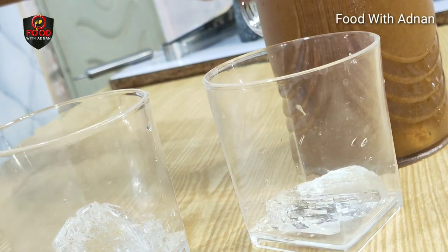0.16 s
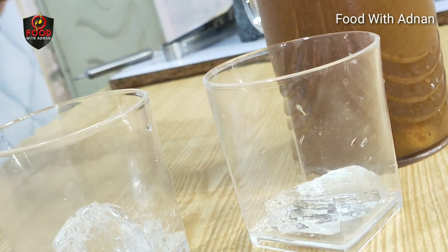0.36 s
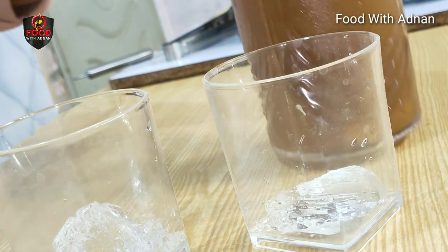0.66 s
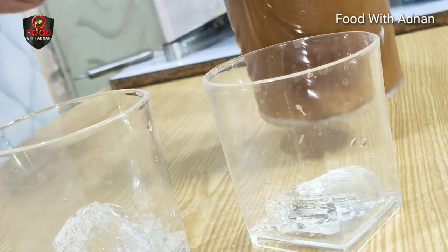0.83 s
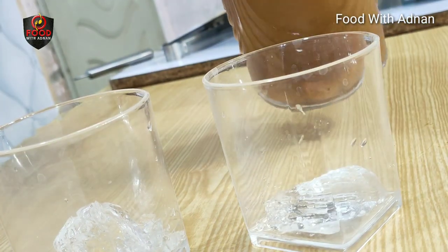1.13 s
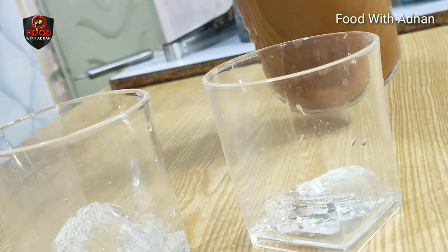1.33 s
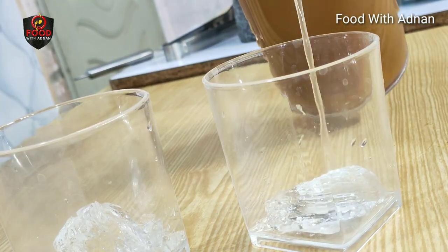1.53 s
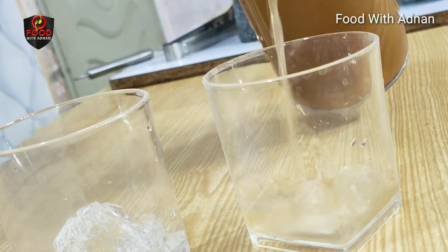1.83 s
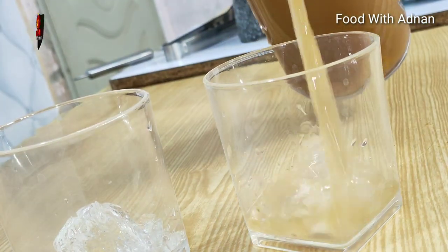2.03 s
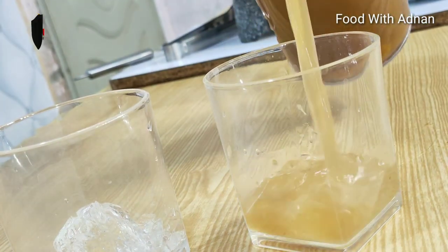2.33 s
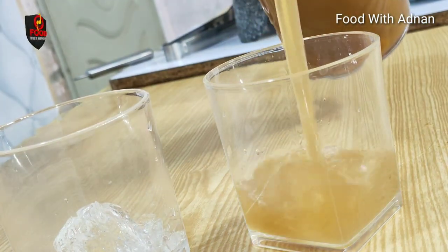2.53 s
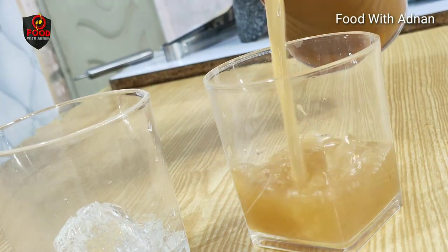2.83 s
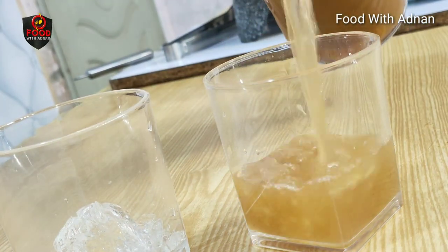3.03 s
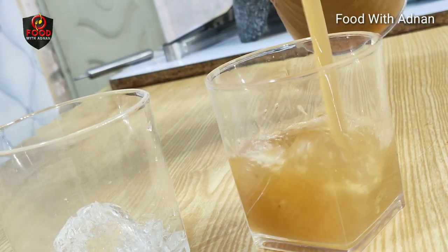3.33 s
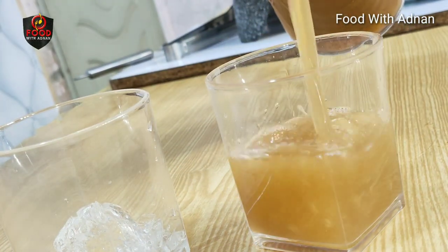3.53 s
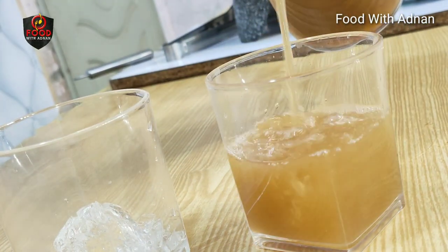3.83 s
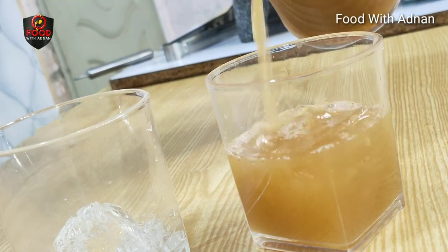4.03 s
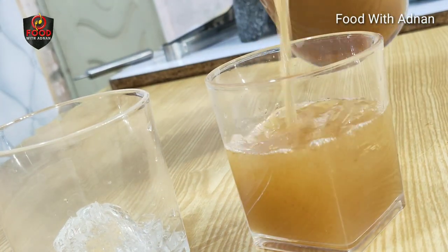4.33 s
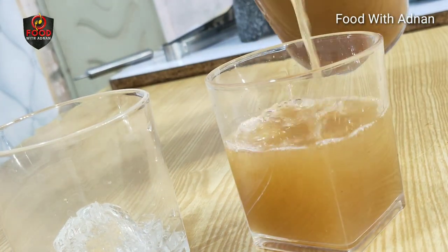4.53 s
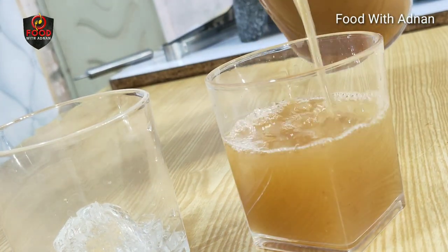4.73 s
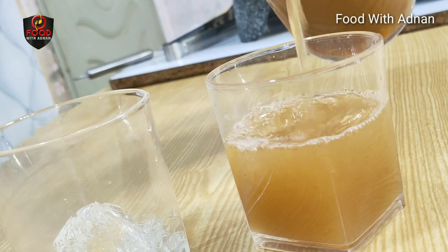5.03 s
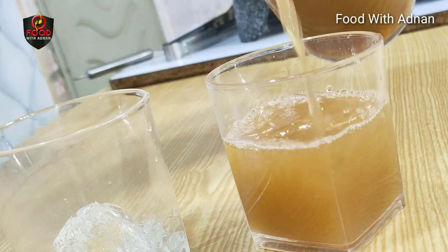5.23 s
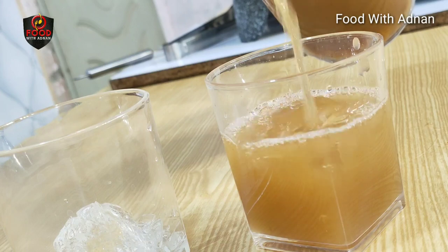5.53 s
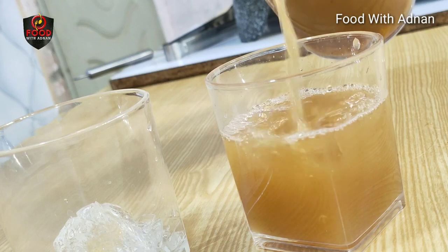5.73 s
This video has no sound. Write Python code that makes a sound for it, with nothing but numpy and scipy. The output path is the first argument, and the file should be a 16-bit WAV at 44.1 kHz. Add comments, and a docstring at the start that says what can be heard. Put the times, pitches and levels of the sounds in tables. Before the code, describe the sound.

Quiet pouring of a drink over ice in a glass, broken by two short clattering clunks and followed by soft low glugs and bubbles.

```python
"""Ice cubes drop into a glass tumbler on a worktop in a hard-walled kitchen while a drink is poured over them.
Each blow excites decaying modes of the glass, a short note of the cube and a burst of crushing noise; small
rebounds follow each fall. Soft bumps of wet ice and low glugs of the drink are short notes with uneven noise,
ice cracks with tiny tinks, bubbles ring with rising pitch, and a thin stream of short decaying grains trickles
in surges. Decaying echoes answer, over a faint hush of shaped noise."""
import sys
import numpy as np
from scipy import signal
from scipy.fft import rfft, irfft, next_fast_len
from scipy.io import wavfile
from scipy.ndimage import uniform_filter1d

SR = 44100
rng = np.random.default_rng(int(sys.argv[2]) if len(sys.argv) > 2 else 0)


def materialize(psi):
    """Save the field psi as 16-bit PCM at rate SR to the path in sys.argv[1].

    A 1-D psi becomes a single channel; in a 2-D psi each row is a channel.
    """
    bounded = np.clip(np.atleast_2d(psi).T, -1, 1)
    quanta = np.round(bounded * 32767).astype(np.int16)
    wavfile.write(sys.argv[1], SR, quanta)


N = 259296  # length in samples

# Cubes striking glass or ice; hardness near 0 is a flat clunk, near 1 a sharp click:
# start_s, strength_db, hardness, cube_note_hz, ring_freedom_db, room_share_db
ICE_HITS = [(1.5677, -54.5, 0.7, 2450, -2, 9.5), (1.573, -51.5, -0.26, 2200, 5, 3),
            (1.6027, -41.5, 1.06, 2030, -5, 3), (1.6143, -47.5, 0.75, 3570, -3, 2.5),
            (1.6215, -46, 0.87, 2910, 1, -1), (1.6595, -49, 1, 2770, -5, -3),
            (1.7717, -24.5, 0.18, 2530, -1, -2.5), (1.799, -33, 0.98, 2683, 11.5, -3),
            (1.8066, -34, 0.59, 3750, -3.5, 3), (1.8306, -41.5, 0.074, 2430, 0, 3.5),
            (1.8351, -33.5, 0.54, 2050, 0.5, 4.5), (1.984, -46, 0.74, 2920, 5, 3.5),
            (2.023, -43.5, 0, 3020, 5, -1.5), (2.031, -41, 0.39, 1910, 1, -2.5),
            (2.098, -43.5, 0.9, 2910, 0.5, -7), (2.1144, -47, 0.87, 2944, -2, -3.5),
            (2.8044, -50, 0.26, 2690, 4, 0), (2.8105, -50.5, 0, 2680, 5.5, -10),
            (3.0014, -28, 0.094, 2020, -4, 0.5), (3.0126, -34.5, 0.49, 2930, 8, 0),
            (3.0242, -34, .7, 2430, -2.5, 3.5), (3.033, -29, 0.7, 4150, -6.5, -5),
            (3.04, -42, 0, 2670, -14.5, -5), (3.0566, -35, 0.19, 2730, -3, 4),
            (3.088, -40.5, 0.36, 2550, 8, -1), (3.13, -39, 0, 2720, -6, -2),
            (3.1852, -46, 0.13, 1860, 0.5, 3), (3.196, -45.5, 0, 2540, 3, -5.5),
            (3.222, -46, 0.41, 2700, 4.5, -6)]
# Rebounds as the ice settles after a fall: start_s, initial_level_db
ICE_FALLS = [(1.80, -48), (3.00, -50)]
SETTLE_S, SETTLE_DB_PER_S, SETTLE_GAP_S = 0.33, 48.5, 0.03  # duration, decay, mean gap
SETTLE_NOTE_HZ = 2650
# Tumbler modes on the worktop, nearly empty: mode_hz, relative_level_db, t60_s
EMPTY_GLASS_MODES = [(102, -40, 0.5), (248, -28.5, 0.14), (530, 0, 0.012), (1008, 1, 0.027),
                     (1064, -33.5, .4), (1115, -10.5, 0.017), (2250, -6.5, 0.016), (2120, -32.5, 0.4),
                     (2432, -3.5, 0.027), (4100, -4, 0.014), (4360, -13.5, 0.011)]
# Tumbler modes when part filled: mode_hz, relative_level_db, t60_s
FILLED_GLASS_MODES = [(106.8, -30.5, 0.64), (228, -20, 0.17), (408, -10, 0.0012), (537, 2.5, 0.0088),
                      (1060, -33, .42), (1065, -1, 0.01), (1307, -30.5, 0.26), (1430, -37.5, 0.41),
                      (1457, -15.5, 0.022), (2774, -3, 0.017), (4350, -5, 0.014)]
FILLED_FROM_S = 2.5
# Attack balance of a flat clunk: thud_db, knock_db, ring_db, tick_db
CLUNK_BALANCE = (-4, 2, -9.5, -23.5)
# Attack balance of a sharp click: thud_db, knock_db, ring_db, tick_db
CLICK_BALANCE = (-5.5, -10.5, 0, -3)
# Edges of the thud, knock, ring and tick bands: edge_hz
BAND_EDGES_HZ = [65, 800, 1700, 3400, 14000]
BANDS = [
    signal.butter(3, band, "band", fs=SR, output="sos")
    for band in zip(BAND_EDGES_HZ, BAND_EDGES_HZ[1:])
]
# Spectrum of a brittle contact: frequency_hz, relative_level_db
CONTACT_COLOUR = [(80, -4.5), (420, 11), (1500, 0), (3500, 2.5), (5000, 4), (8500, 0.5), (10500, -11),
                  (15000, -12)]
SPLINTER_S = 0.003  # how long ice splinters at a blow
HARD_CRUSH_DB = 5.5  # extra splintering of a sharp click over a flat clunk
# Soft bumps of wet ice and low glugs of the poured drink: start_s, strength_db, hollow_note_hz
SOFT_BUMPS_AND_GLUGS = [(0.244, -71, 420), (0.317, -66, 1540), (0.484, -72, 1290), (0.895, -61, 904),
                        (1.262, -63.5, 1485), (1.443, -65, 1505), (1.456, -58.5, 2560),
                        (1.496, -63.5, 1400), (1.531, -61, 910), (1.742, -62, 2690), (2.397, -62.5, 1555),
                        (2.525, -70, 1148), (2.602, -58.5, 1028), (2.728, -59, 1090), (2.753, -60, 720),
                        (2.873, -62, 940), (2.948, -61, 807), (2.982, -57, 920), (3.318, -58.5, 1215),
                        (3.429, -65.5, 1149), (3.581, -68, 690), (3.63, -58.5, 596), (3.71, -67.5, 409),
                        (3.739, -61, 607), (3.827, -59, 570), (3.859, -53.5, 550), (3.9595, -56.5, 510),
                        (4, -51, 568), (4.051, -61.5, 940), (4.263, -65, 1453), (4.300, -61.5, 620),
                        (4.3405, -55, 644), (4.377, -62, 629), (4.417, -60.5, 420), (5.177, -67, 1780)]
# Attack balance of a bump or glug by its note: hollow_note_hz, thud_db, knock_db, ring_db, tick_db
BUMP_BALANCE = [(565, 0, -7.5, -13.5, -22.5), (1000, -4.5, 1.5, -7, -19), (1482, -3, 1, -3.5, -18.5),
                (2600, -13, -6, -2, -16.5)]
# Spectrum of the uneven noise in a bump or glug: frequency_hz, relative_level_db
RUB_COLOUR = [(100, -3), (550, 2), (1200, -4), (1500, -6.5), (1950, -6.5), (2750, 1.5), (3400, -12),
              (4500, -9.5), (6000, -12.5), (9000, -18.5), (14000, -17.5)]
# Tiny cracks in the ice: start_s, peak_db, note_hz
ICE_CRACKS = [(2.4146, -59.5, 6070), (2.445, -63, 4020), (2.626, -58, 4490), (2.825, -54, 4100),
              (2.874, -55, 4500), (2.9143, -56, 7130), (2.948, -52, 4350), (4.1999, -63, 4640),
              (4.4164, -57, 4280), (4.7516, -63.5, 6720), (5.1674, -61, 8800), (5.425, -58, 8530)]
# Small drips that trap a bubble: start_s, level_db, note_hz
BUBBLE_DRIPS = [(3.867, -50, 1950), (4.035, -52.5, 2480), (4.262, -52, 1800), (4.419, -52, 1880),
                (4.682, -55, 1810), (5.179, -58, 1930)]
# Surges of the stream: peak_s, level_db, build_up_s, fall_back_s
STREAM_SURGES = [(1.679, -62.5, 0.15, 0.067), (2.95, -65.5, 0.38, .2), (3.92, -70, 0.39, .55)]
STEADY_STREAM_DB = -76
# Spectrum of the trickle: frequency_hz, relative_level_db
TRICKLE_COLOUR = [(100, -0.5), (400, 1.5), (700, 1.5), (1500, -3.5), (2700, -12), (3800, -20), (9000, -22),
                  (13000, -29.5)]
# Faint dull pops: peak_s, peak_db
DULL_POPS = [(0.1338, -49), (0.7332, -45), (4.6809, -49.5), (5.855, -51)]
# Late echo of the kitchen: frequency_hz, t60_s, relative_level_db
ROOM_DECAY = [(50, 1, -10), (130, 0.91, -2.5), (250, 0.9, 4), (520, 0.47, -2), (800, 0.78, -2.5),
              (1170, 0.56, 2), (1900, 0.57, -2), (2785, 0.53, -4.5), (4600, 0.43, 2.5), (8140, 0.46, -4),
              (12000, 0.73, -5)]
# Spectrum of the hush: frequency_hz, relative_density_db_per_hz
HUSH_COLOUR = [(15, -42.5), (25, 8.5), (90, -2), (142, -3), (373, -2.5), (673, -5.5), (769, -13),
               (1210, -10), (1350, -17.5), (2370, -18), (4040, -30), (10300, -32), (12100, -31),
               (13500, -47.5), (15000, -46)]
HUSH_LEVEL_DB = -70.5
# Response of the microphone: frequency_hz, gain_db
MIC_RESPONSE = [(20, 1.5), (9500, -1.5), (10500, 0), (11500, -13), (13000, -14.5), (16000, -12)]
BAND_LIMIT_HZ = 15400


def clunks(note_db=11, note_t60=0.015, wall_ring_db=-3, crush_db=-4, rise=0.00044, spread_db=3.0, echoes=3):
    """Impact excitation: a blow rings glass modes and a cube note; returns direct sound and room feeds."""
    direct, outward = np.zeros(N), np.zeros((echoes, N))
    t = np.arange(SR // 2) / SR
    brief = t[:SR // 30]
    empty = np.array([ring(t, *mode) for mode in EMPTY_GLASS_MODES])
    filled = np.array([ring(t, *mode) for mode in FILLED_GLASS_MODES])
    clunk, click = np.array(CLUNK_BALANCE), np.array(CLICK_BALANCE)
    for k, (s, strength_db, hardness, hz, free_db, room_db) in enumerate(ICE_HITS + settling()):
        balance = (1 - hardness) * clunk + hardness * click
        thud_db, knock_db, ring_db, tick_db = strength_db + balance
        modes = empty if s < FILLED_FROM_S else filled
        # each spot on the wall favours other modes
        mode_gains = amp(spread_db * rng.standard_normal((len(modes), 1)))
        glass = (mode_gains * modes).sum(0)
        # brittle ice splinters for a few milliseconds, then stops sharply
        crush = coloured(rng.standard_normal(len(brief)), CONTACT_COLOUR)
        crush = crush * np.exp(-(brief / SPLINTER_S) ** 2)
        add(glass, 0, amp(crush_db + HARD_CRUSH_DB * hardness) * crush)
        levels_db = thud_db, knock_db, ring_db + free_db + wall_ring_db, tick_db
        sound = weigh(glass * swell(t, rise), levels_db, attack=0.006)
        cube_note = ring(brief, hz, ring_db + free_db + note_db, note_t60)
        add(sound, 0, cube_note * swell(brief, rise))
        add(direct, s, sound)
        # blows take turns among several random echoes of the same kitchen
        add(outward[k % echoes], s, amp(room_db) * sound)
    return direct, outward


def settling(spread_db=3, hardness=0.98, note_spread=0.12, free_db=1, room_db=-3):
    """Energy loss in rebounds: small uneven blows die away after each fall, as rows like ICE_HITS."""
    rows = []
    for start, initial_db in ICE_FALLS:
        wait, size, note = rng.random((3, 40))
        times = np.cumsum(SETTLE_GAP_S * (0.5 + wait))
        for since, level_offset, note_offset in zip(times, 2 * size - 1, 2 * note - 1):
            if since < SETTLE_S:
                level_db = initial_db - SETTLE_DB_PER_S * since + spread_db * level_offset
                hz = SETTLE_NOTE_HZ * (1 + note_spread * note_offset)
                rows.append((start + since, level_db, hardness, hz, free_db, room_db))
    return rows


def weigh(sound, levels_db, attack):
    """Band balance: sets the strength of thud, knock, ring and tick in the attack."""
    parts = [signal.sosfilt(band, sound) for band in BANDS]
    first = int(attack * SR)
    return sum(amp(db) * part / rms(part[:first]) for db, part in zip(levels_db, parts))


def soft_bumps_and_glugs(note_db=6, note_t60=0.027, rub_t60=0.097, rub_db=-1, rise=0.0054):
    """Damped resonance: each bump or glug is a hollow decaying note with a little uneven noise."""
    out, t = np.zeros(N), np.arange(SR // 6) / SR
    faint = stirred(per_s=5, over_db=2.5, spread_db=3, low_hz=404, high_hz=1485)
    for s, db, hz in SOFT_BUMPS_AND_GLUGS + faint:
        # a low note is mostly thud, a high one knock and ring
        levels_db = [db + read(BUMP_BALANCE, hz, axis=band) for band in range(1, len(BUMP_BALANCE[0]))]
        note = ring(t, hz, note_db, note_t60) * swell(t, rise / 2)
        rub = scrape(t, rub_t60, RUB_COLOUR) * (0.5 + unevenness(t, per_s=970)) * swell(t, rise)
        add(out, s, weigh(note + amp(rub_db) * rub, levels_db, attack=0.015))
    return out


def unevenness(t, per_s):
    """Random modulation: an uneven train of millisecond bumps at unit rms."""
    impulses = rng.random(len(t)) * (rng.random(len(t)) < per_s / SR)
    bumps = uniform_filter1d(impulses, size=45)
    return bumps / rms(bumps)


def scrape(t, t60, colour):
    """Noise burst: coloured noise under exponential decay."""
    return coloured(rng.standard_normal(len(t)), colour) * amp(-60 * t / t60)


def cracks(t60=0.016, crush_db=-3, rise=0.00025):
    """Brittle fracture: warming ice splits with a tiny high tink of mode and noise."""
    out, t = np.zeros(N), np.arange(SR // 20) / SR
    faint = stirred(per_s=9.1, over_db=1.5, spread_db=5, low_hz=3890, high_hz=5415)
    for s, db, hz in ICE_CRACKS + faint:
        split = ring(t, hz, 0, t60) + amp(crush_db) * scrape(t, t60, CONTACT_COLOUR)
        tink = signal.sosfilt(BANDS[-1], split * swell(t, rise))
        add(out, s, amp(db) * tink / abs(tink).max())
    return out


def drips(t60=0.02, glide_per_s=5, rise=0.00067):
    """Bubble resonance: a decaying note climbs in pitch as the bubble nears the surface."""
    out, t = np.zeros(N), np.arange(SR // 20) / SR
    faint = stirred(per_s=12, over_db=7, spread_db=3.5, low_hz=498.7, high_hz=3200)
    for s, db, hz in BUBBLE_DRIPS + faint:
        # the glide scales the phase, so the pitch climbs at twice this rate
        bubble = ring(t, hz * (1 + glide_per_s * t), db, t60)
        add(out, s, bubble * swell(t, rise))
    return out


def trickle(per_s=900, spread_db=3.0, t60_at_1khz=0.003):
    """Granular superposition: fine wet grains add up to a trickle whose level follows the surges."""
    out, t = np.zeros(N), np.arange(SR // 100) / SR
    notes = np.geomspace(250, 9000, num=30)
    drops = int(per_s / len(notes) * N / SR)
    for hz in notes:
        starts = rng.random(drops) * N / SR
        sizes = amp(spread_db * np.minimum(rng.exponential(1, drops), 3))
        life = t60_at_1khz * np.sqrt(1000 / hz)  # small drops die sooner
        grain = ring(t, hz, 0, life) * (hz / 1000) ** 0.67
        for s, size in zip(starts, sizes):
            add(out, s, size * grain)
    return coloured(out, TRICKLE_COLOUR) * stir(np.arange(N) / SR)


def stir(s):
    """Power summation: surges over a thin steady flow give the stream's gain at a time."""
    surges = [
        amp(db) * np.exp(-((s - peak) / np.where(s < peak, up, down)) ** 2)
        for peak, db, up, down in STREAM_SURGES
    ]
    return np.sqrt(amp(STEADY_STREAM_DB) ** 2 + np.sum(np.square(surges), axis=0))


def stirred(per_s, over_db, spread_db, low_hz, high_hz, count=300):
    """Random excitation: faint events, louder as the stream surges, as rows of start_s, level_db, note_hz."""
    wait, size, note = rng.random((count, 3)).T
    times = (np.arange(count) + wait) / per_s  # one random moment in each equal slot
    levels_db = 20 * np.log10(stir(times)) + over_db + spread_db * (2 * size - 1)
    notes = low_hz * (high_hz / low_hz) ** note
    return [row for row in zip(times, levels_db, notes) if row[0] < N / SR]


def pops(width=0.00024):
    """Pressure pulse: each dull pop is a single smooth push that peaks once and dies away."""
    out, t = np.zeros(N), np.arange(SR // 100) / SR
    for s, db in DULL_POPS:
        add(out, s - width, -amp(db) * t / width * np.exp(1 - t / width))
    return out


def kitchen(x, build=0.0059, early_db=-8, early_t60=0.045):
    """Reverberation: quick reflections off the worktop and things on it, then a dense tail from the walls."""
    taps = rng.choice([-1., 1.], SR) * (rng.random(SR) < 5000 / SR)
    hz, frame_s, z = signal.stft(taps / rms(taps), SR, nperseg=256)
    t60, db = read(ROOM_DECAY, hz)[:, None], read(ROOM_DECAY, hz, axis=2)[:, None]
    equal_energy = np.sqrt(2 * np.log(1000) / (t60 * SR))  # whatever the decay time
    z = z * amp(db - 60 * frame_s / t60) * equal_energy
    tail = signal.istft(z, SR, nperseg=256)[1][:SR]
    t = np.arange(SR) / SR
    since = np.maximum(t - 0.005, 0)  # echoes begin after 5 ms
    early = rng.choice([-1., 1.], SR) * (rng.random(SR) < 3000 / SR)
    early = early * (since > 0) * amp(-60 * t / early_t60)
    echo = tail * (1 - np.exp(-since / build)) + amp(early_db) * early / np.linalg.norm(early)
    return signal.fftconvolve(x, echo)[:N]


def hush():
    """Stationary noise: a faint steady background with a shaped spectrum."""
    return amp(HUSH_LEVEL_DB) * coloured(rng.standard_normal(N), HUSH_COLOUR)


def ring(t, hz, db, t60):
    """Modal decay: a sine that falls by 60 dB in t60 seconds."""
    return -amp(db - 60 * t / t60) * np.sin(2 * np.pi * hz * t)


def swell(t, rise):
    """Smooth onset: pressure builds up from zero."""
    return 1 - np.exp(-(t / rise) ** 2)


def coloured(x, points):
    """Spectral shaping: filters a signal and scales it to unit rms."""
    y = filtered(x, points)
    return y / rms(y)


def filtered(x, points):
    """Linear filtering: multiplies the spectrum by a smooth frequency response."""
    size = next_fast_len(len(x))
    gains = amp(read(points, np.fft.rfftfreq(size, 1 / SR)))
    return irfft(rfft(x, size) * gains, size)[:len(x)]


def read(points, hz, axis=1):
    """Interpolation: joins one column of a table by straight lines over log frequency."""
    table = np.transpose(points)
    return np.interp(np.log(hz + 1), np.log(table[0] + 1), table[axis])


def add(mix, s, sound):
    """Superposition: adds a sound into the mix at a time in seconds."""
    part = mix[max(round(s * SR), 0):][:len(sound)]
    part += sound[:len(part)]


def amp(db):
    """Level to amplitude: decibels to gain."""
    return 10 ** (np.asarray(db) / 20)


def rms(x):
    """Effective value: root mean square."""
    return np.sqrt(np.mean(x ** 2) + 1e-24)


def scene(clunk_room_db=-0.5, small_room_db=-5):
    """Superposition: clunks and small noises in one room, through a slightly dull microphone, over a hush."""
    direct, outward = clunks()
    small = soft_bumps_and_glugs() + cracks() + drips() + trickle()
    clunk_echo = amp(clunk_room_db) * sum(kitchen(feed) for feed in outward)
    small_echo = amp(small_room_db) * kitchen(small)
    heard = filtered(direct + small + clunk_echo + small_echo + pops(), MIC_RESPONSE)
    return (heard + hush())[None]


def record(dry):
    """Band limitation: a linear-phase low-pass removes the highest treble."""
    lowpass = signal.firwin(511, BAND_LIMIT_HZ, window=("kaiser", 9), fs=SR)
    return signal.oaconvolve(dry, lowpass[None], "same")


dry = scene()
out = record(dry)
materialize(out)
```